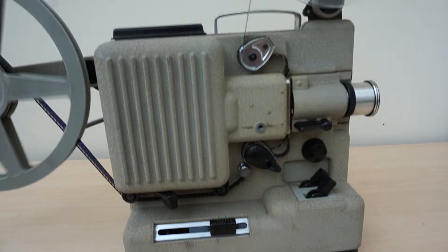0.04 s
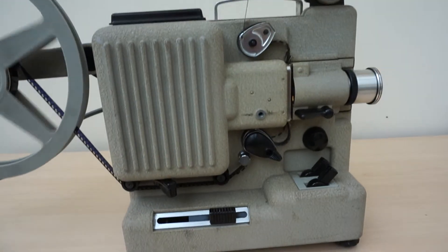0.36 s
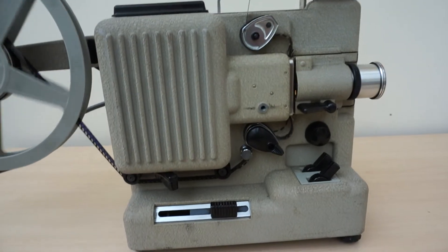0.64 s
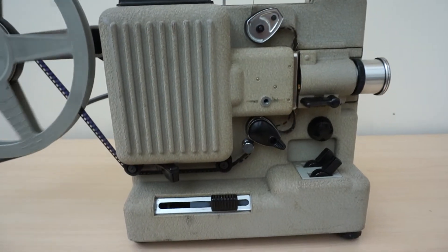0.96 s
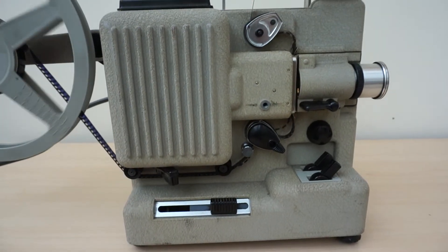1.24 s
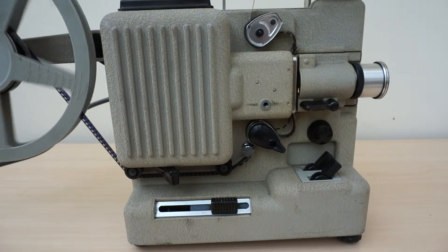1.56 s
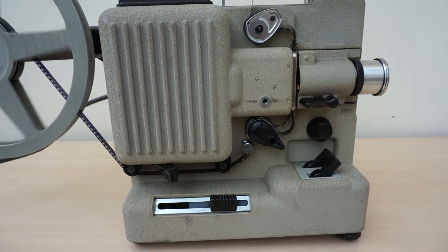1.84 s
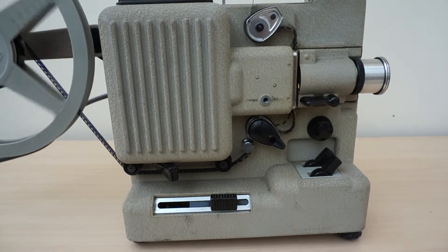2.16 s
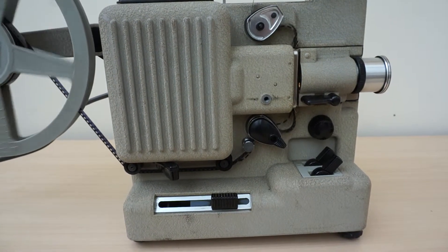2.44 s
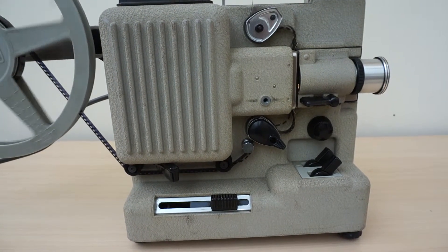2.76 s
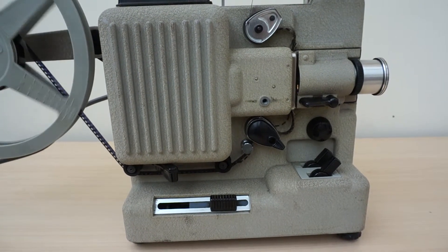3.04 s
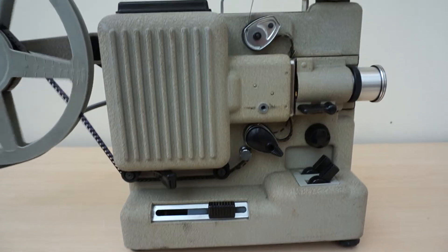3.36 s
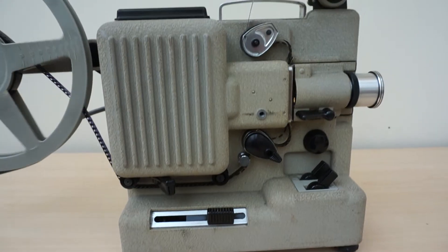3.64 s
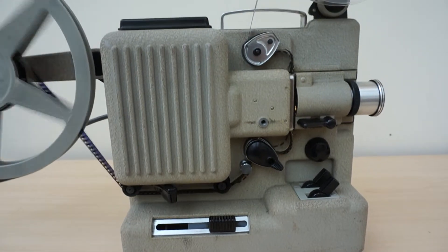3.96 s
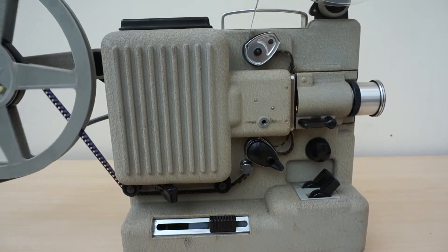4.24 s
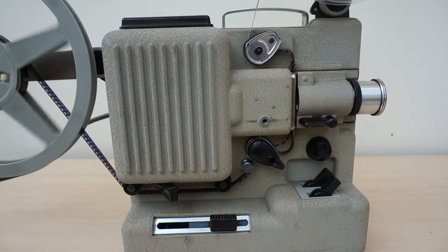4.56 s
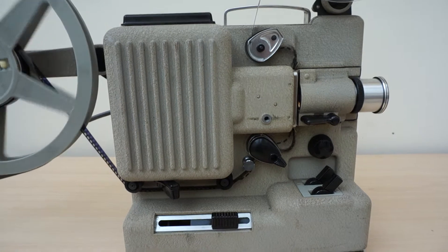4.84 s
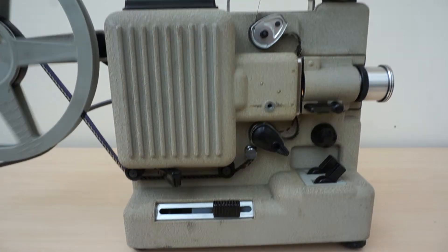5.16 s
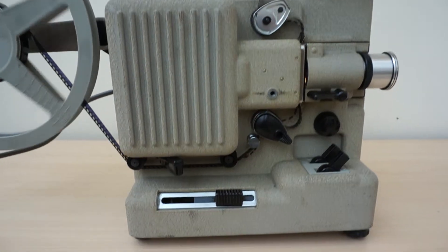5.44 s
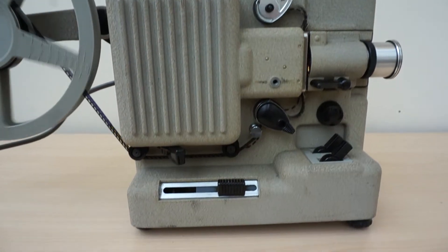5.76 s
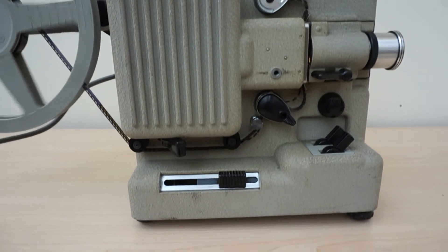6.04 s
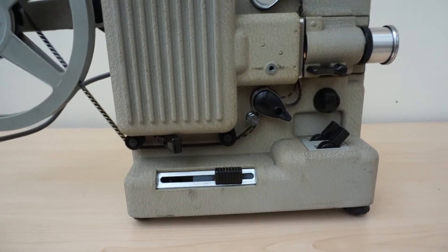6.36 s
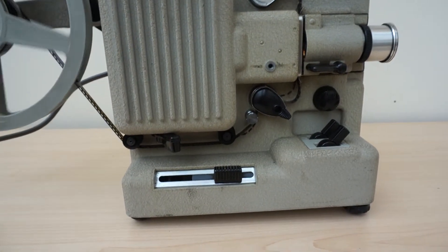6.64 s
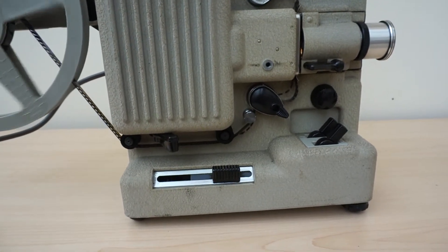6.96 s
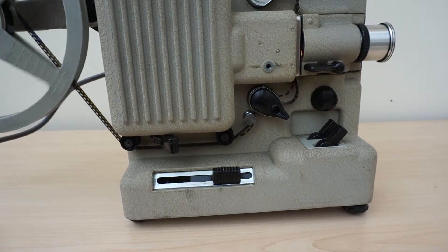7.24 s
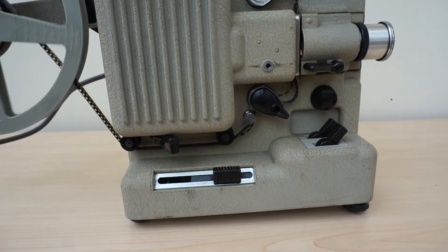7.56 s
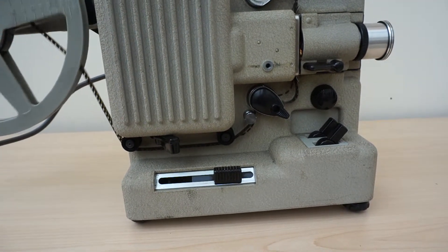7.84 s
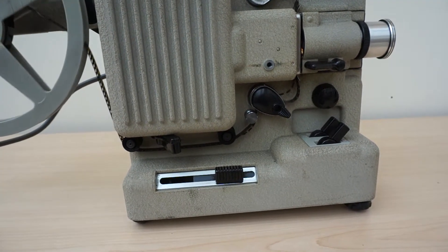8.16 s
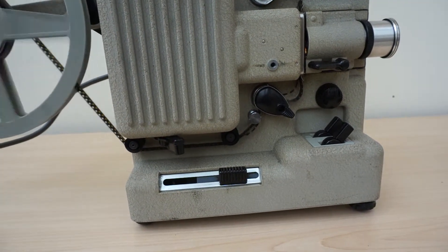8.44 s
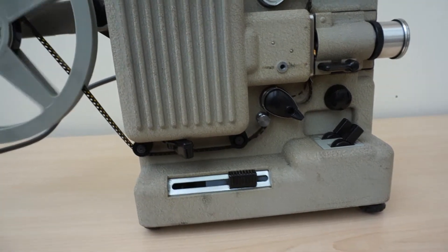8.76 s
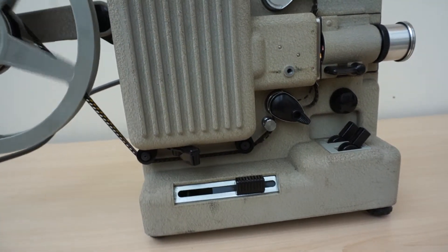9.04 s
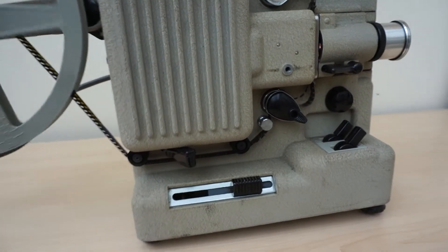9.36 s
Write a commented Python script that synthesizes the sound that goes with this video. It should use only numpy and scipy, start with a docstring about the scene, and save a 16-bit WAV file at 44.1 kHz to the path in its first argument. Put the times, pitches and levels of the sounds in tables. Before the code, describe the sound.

A small film projector runs on a table close to the microphone, in a quiet room. Sharp metallic ticks, gear knocks and the rasp of film repeat about thirteen times a second over a fan whir and faint hum. The film snaps several times in the first second and again around four seconds. The reel, to the left, gives short high squeaks and scrapes around the middle and again near the end.

```python
"""On a table, close to the microphone, a small film projector runs at about 13 frames a second.
Every frame the claw ticks, the gear train knocks, the film rasps through the gate and the guides ting,
all ringing the metal case over the whir of the fan. Now and then the film snaps on the claw or the
shutter grazes. The reel scrapes and squeaks in bouts, and the loudest peaks make the gain control
duck the whole machine."""
import sys
import numpy as np
from scipy import signal
from scipy.fft import rfft, irfft, next_fast_len
from scipy.io import wavfile
from scipy.ndimage import uniform_filter1d, map_coordinates

SR = 44100
rng = np.random.default_rng(int(sys.argv[2]) if len(sys.argv) > 2 else 0)


def log_audio(samples):
    """Write samples as a 16-bit WAV file to the path given in sys.argv[1]."""
    # one column per channel
    frames = np.atleast_2d(samples).T
    # limit to full scale, then quantise
    limited = np.clip(frames, -1, 1)
    pcm = np.round(limited * 32767).astype(np.int16)
    wavfile.write(sys.argv[1], SR, pcm)


N = 414540
TIME = np.arange(N) / SR
EDGE_HZ = 11200


def claw(level_db=4, rise_s=.00017, lag_s=.00023, top_hz=11000, glide_s=.0013,
         chatter_db=-14, chatter_s=.0031, uneven_db=1.3):
    """A hard tick as the claw enters a sprocket hole; treble runs ahead in thin metal, so it dives."""
    # how hard the claw catches the film: time_s, level_db
    bite = [(0, -27), (.7, -33), (1.2, -21), (1.6, -24), (2.3, -21), (3.1, -26), (3.5, -23), (4.3, -29),
            (5.2, -31), (5.85, -19.5), (6.45, -16.5), (6.8, -34), (7.45, -20.5), (8.3, -21), (8.9, -16),
            (9.4, -25)]
    # tone of the tick: frequency_hz, level_db
    colour = [(60, -48), (800, -26), (2500, -9), (4000, -10), (6500, 9.5), (9000, -16), (10500, 13)]
    out, t = np.zeros(N), around(.012)
    age = np.maximum(t, 0)
    envelope = age / rise_s * np.exp(1 - age / rise_s)
    tail = amp(chatter_db) * (t > 0) * np.exp(-age / chatter_s)
    sweep = 2 * np.pi * top_hz * glide_s * np.log1p(age / glide_s)
    for s in frame_times():
        db = np.interp(s, *np.transpose(bite)) + uneven_db * rng.standard_normal()
        tick = envelope * np.sin(sweep * rng.uniform(.9, 1.05))
        chatter = tail * rng.standard_normal(len(t))
        add(out, s + lag_s, amp(db) * (tick + chatter))
    return amp(level_db) * through_case(out, colour)


def gears(level_db=-27, thump_s=.00688, thump_hz=430, thump_db=-16, thump_width_s=.0016):
    """Cam and gears knock out the same run every frame; the pull-down ends in a dull thump."""
    # one frame's knocks, timed from the tick: offset_s, pitch_hz, level_db, width_s
    knocks = [(-.0366, 1570, -11, 0.00093), (-.0335, 2430, -5.5, 0.00019), (-.0312, 1576, -8.5, 0.00091),
              (-.0262, 1040, -10, 0.00084), (-.025, 680, -14.5, 0.00086), (-.0215, 1380, -4, 0.00037),
              (-.0185, 1580, -7.5, .00036), (-.015, 966, -12, 0.00097), (-.0143, 1480, -6, 0.00085),
              (-.0085, 1240, -9.5, 0.00078), (-.0075, 2440, -17.5, 0.0021), (-.0055, 1650, -8, 0.00053),
              (-.0037, 1330, -5.5, 0.00053), (-.0035, 1010, -10.5, 0.00065), (.0022, 2720, -8.5, 0.00065),
              (.0019, 1052, -5, 0.0013), (.0036, 1470, -4, 0.00073), (.004, 1270, -6.5, 0.0015),
              (.008, 1360, -22, 0.001), (.0162, 2450, -12, .001), (.0175, 1380, -8, 0.0013),
              (.02, 1050, -7.5, 0.00081), (.0208, 1750, -10.5, 0.00067), (.022, 1270, -7, 0.00067),
              (.030, 1290, -3.5, 0.00047), (.0335, 1750, -3, 0.00038), (.0343, 1110, -7, 0.00096),
              (.0372, 1550, -3.5, 0.00046), (.0385, 950, -12, .00085)]
    run = knocks + [(thump_s, thump_hz, thump_db, thump_width_s)]
    return amp(level_db) * through_case(strikes(run, jitter_s=.00007, uneven_db=.8, detune=.016))


def gate(level_db=-30.5, uneven_db=1.5, grain_db=.2):
    """Film slides through the gate: grainy friction in several short strokes a frame."""
    # one frame's strokes, timed from the tick: offset_s, width_s, level_db
    rasps = [(-.030, 0.0042, -13.5), (-.0185, 0.0014, 1), (-.0042, 0.0011, 2.5), (.0015, 0.0011, 4.5),
             (.006, 0.0014, 4), (0.0196, 0.0012, 2), (0.0346, 0.003, -4)]
    # tone of the friction: frequency_hz, level_db
    colour = [(60, -52), (500, -52), (1500, 3), (2700, 6), (4000, -1.5), (6000, -1.5), (8500, 1),
              (11000, -0.5)]
    strokes = np.zeros(N)
    for s in frame_times():
        for (offset, width, db), hard in zip(rasps, rng.standard_normal(len(rasps))):
            add(strokes, s + offset, amp(db + uneven_db * hard) * bell(around(4 * width), width))
    grains = unit(amp(grain_db * noise_band(0, 930)) * rng.standard_normal(N))
    return amp(level_db) * through_case(strokes * grains, colour)


def guides(level_db=-38):
    """The sprung guides ting as the film jerks past: fine, regular, metallic."""
    # one frame's tings, timed from the tick: offset_s, pitch_hz, level_db, width_s
    tings = [(-.0325, 7600, -29, 0.00099), (-.0325, 5130, -14, 0.0015), (-.024, 7550, -3.5, 0.00087),
             (-.019, 5020, -2, .0014), (-.005, 7700, 1, .0009), (-.003, 5300, -0.5, .0008),
             (.001, 5300, -18, .0007), (.003, 6160, -4.5, .0009), (.0185, 7700, 0, 0.00073),
             (.0192, 5250, -5, .0012), (.020, 9000, -6, .0007), (.034, 5150, 1.5, 0.0016)]
    return amp(level_db) * through_case(strikes(tings, jitter_s=.0005, uneven_db=1, detune=.0093))


def snaps(crack_db=-2, ring_db=-1, second_db=-5, blur_rad=.45):
    """The film catches and lets go: a crack with two short, rough rings of the taut strip."""
    # snaps on the claw: start_s, level_db, ring_hz, second_ring_hz, rise_s
    catches = [(0.2916, -17, 2250, 4700, 0.001), (0.4506, -23, 2280, 4100, 0.00063),
               (.609, -24, 2630, 3700, 0.0019), (.61, -29, 553, 520, .004),
               (.7645, -28, 1380, 2500, 0.0018), (0.8428, -11.5, 8800, 9600, 0.00038),
               (.8454, -11.5, 2240, 3850, 0.0015), (0.8485, -15, 4500, 8400, 0.00056),
               (0.921, -17, 8750, 1370, 0.00067), (0.9244, -14, 2250, 1340, 0.0021),
               (0.9266, -10, 8900, 3600, 0.00058), (1.0783, -10, 3930, 2730, 0.00082),
               (2.1428, -21.5, 4440, 7400, 0.0012), (3.5902, -17, 8400, 9600, .0004),
               (3.8434, -14, 2360, 2510, 0.00092), (4.233, -25, 2350, 2700, 0.00123),
               (4.3075, -22, 2350, 2680, .0012), (4.389, -22, 2390, 3900, .0013),
               (4.4692, -17, 9000, 7830, 0.0016), (4.471, -13, 3930, 2440, 0.0014),
               (4.6225, -22.5, 2590, 2750, 0.0016)]
    # tone of the crack: frequency_hz, level_db
    colour = [(40, -44), (200, -34), (600, -14), (1200, -12.5), (2400, -4), (3500, -15.5), (6000, -16),
              (8800, -13.5), (11000, -17.5)]
    crack, ring, wander = np.zeros(N), np.zeros(N), noise_band(0, 380)
    for s, db, hz, second_hz, rise in catches:
        t = around(10 * rise)
        age = np.maximum(t, 0) / rise
        envelope = amp(db) * age * np.exp(1 - age)
        slip = blur_rad * wander[int(s * SR):][:len(t)]
        first = amp(ring_db) * np.sin(2 * np.pi * hz * t + slip)
        second = amp(second_db) * np.sin(2 * np.pi * second_hz * t - slip)
        add(crack, s, envelope)
        add(ring, s, envelope * (first + second))
    ring = signal.sosfilt(signal.butter(3, 350, "high", fs=SR, output="sos"), ring)
    return amp(crack_db) * through_case(crack * rng.standard_normal(N), colour) + ring


def squeaks(sag=.0044, smear=.045, rasp_db=-8, reel_hz=8170, reel_db=-14):
    """Stick-slip whistles sag in pitch; rough contact smears them and adds rasp. The reel rings on."""
    # reel squeaks: middle_s, length_s, pitch_hz, level_db, sub_octave_db, roughness (0-1)
    whistles = [(1.877, 0.1, 4160, -34, -30, 0.44), (2.917, .044, 5310, -35, -30, .25),
                (2.974, .045, 5320, -28, -30, .3), (3.334, .007, 6300, -23, -30, .7),
                (3.335, 0.0076, 4020, -22.5, -30, .3), (3.399, 0.012, 8220, -14.5, -7, 0),
                (3.445, 0.014, 8210, -4, -11, 0.14), (3.471, 0.013, 8150, -7.5, -6, 0.2),
                (3.498, 0.014, 8060, -12, -2.5, 0.4), (3.528, .005, 5000, -18, -30, 0.4),
                (3.545, .006, 5050, -21, -17, 0.4), (3.86, .022, 6040, -31, -30, .25),
                (3.891, .028, 4780, -31, -30, 0.4), (3.895, .016, 7400, -33, -30, .15),
                (3.898, .014, 6070, -30, -28.5, .2), (3.922, 0.03, 5300, -17, -12, 0),
                (3.92, .012, 6740, -25, -29, .1), (3.933, .016, 6280, -24, -30, .15),
                (3.951, .01, 6300, -27, -30, .15), (3.952, 0.014, 4570, -25, -30, 0),
                (6.046, 0.055, 4130, -31, -30, 0.6), (6.08, 0.04, 6550, -35, -30, 0.2),
                (6.367, .075, 5130, -30, -30, .5), (6.372, 0.015, 5130, -27, -30, 0.56),
                (7.493, .012, 6370, -25, -30, .4), (7.513, 0.0091, 6400, -24, -30, 0.4),
                (7.533, .0075, 6350, -6.5, -22, .15), (7.635, 0.015, 8150, -7.5, -6.5, 0.13),
                (7.669, 0.015, 8130, -3.5, -11.5, 0.15), (7.694, 0.0097, 7930, -8.5, -4, .3),
                (7.696, 0.015, 5000, -18, -30, 0.4), (7.698, .015, 7100, -15, -30, .5)]
    out, wander, rasp = np.zeros(N), noise_band(0, 450), noise_band(7000, 1300)
    for s, length, hz, db, sub_db, rough in whistles:
        t = around(length / 2)
        now = slice(int(s * SR), int(s * SR) + len(t))
        pitch_hz = hz * (1 - sag * t / length + smear * rough * wander[now])
        phase = 2 * np.pi * np.cumsum(pitch_hz) / SR
        tone = np.sin(phase) + amp(sub_db) * np.sin(phase / 2) + amp(rasp_db) * rough * rasp[now]
        add(out, s, amp(db) * tone * signal.windows.tukey(len(t), .8))
    return out + amp(reel_db) * ringing(out, reel_hz, width_hz=15)


def scrapes(width_hz=3200, grain_db=2):
    """The film's edge brushes the reel's rim: a grainy hiss that swells and breaks off."""
    # brushes on the rim: peak_s, swell_s, fade_s, centre_hz, level_db
    brushes = [(3.334, 0.047, .008, 6550, -28.5), (3.4, 0.0058, .008, 6340, -14),
               (3.5, 0.13, .09, 7900, -30), (3.926, 0.099, .047, 6100, -23.5),
               (3.949, .009, .0036, 6950, -22), (6.101, 0.053, 0.046, 6750, -31),
               (7.52, 0.034, .03, 7800, -30), (7.576, 0.0072, .0076, 7200, -17.5),
               (7.699, 0.049, 0.056, 7000, -29), (8.392, .076, .04, 7700, -26.5),
               (8.417, 0.021, 0.014, 6840, -25.5)]
    out, t = np.zeros(N), around(.12)
    treble = signal.butter(2, [2500, EDGE_HZ], "band", fs=SR, output="sos")
    for s, swell, fade, hz, db in brushes:
        flicker = unit(uniform_filter1d(rng.standard_normal(len(t)), size=150))
        grains = amp(grain_db * flicker) * rng.standard_normal(len(t))
        hiss = unit(signal.sosfilt(treble, ringing(grains, hz, width_hz)))
        add(out, s, amp(db) * np.interp(t, [-swell, 0, fade], [0, 1, 0]) * hiss)
    return out


def shutter(level_db=4, hz=6900, width_s=.00035, detune=.025):
    """Shutter blades graze their housing in short runs of tiny, high, dry ticks."""
    # blade contacts: time_s, level_db
    grazes = [(.057, -24), (.491, -23), (.517, -28), (.543, -28), (2.269, -26), (2.323, -30), (5.135, -30),
              (5.156, -24), (5.186, -27), (6.027, -27), (6.053, -26), (6.106, -20), (6.16, -27),
              (6.213, -28), (6.969, -30), (7.021, -30), (7.047, -19), (7.074, -28), (7.1, -27),
              (7.153, -26), (7.224, -30), (8.014, -24)]
    out = np.zeros(N)
    for (s, db), bend in zip(grazes, rng.standard_normal(len(grazes))):
        add(out, s, amp(db) * blip(hz * np.exp(detune * bend), width_s))
    return amp(level_db) * out


def motor(whir_db=-37):
    """Fan air blows through the case, over wavering hum lines."""
    # tone of the fan: frequency_hz, level_db
    colour = [(20, -37), (70, -30.5), (120, -21.5), (220, -14), (320, -7), (480, -7.5), (800, -2.5),
              (1500, -5.5), (2500, 1.5), (3700, -8), (5300, -12), (11000, -11.5)]
    # motor and mains hum: pitch_hz, level_db, waver_hz
    lines = [(114.2, -69, 1.1), (202, -71, 0.36), (299.7, -64.5, 1.99), (332.7, -60, 0.93),
             (535.8, -54.5, 7), (645.5, -53, 6.9)]
    out = amp(whir_db) * unit(through_case(rng.standard_normal(N), colour))
    for hz, db, waver_hz in lines:
        pitch_hz = hz + waver_hz * noise_band(0, 5.18)
        out += amp(db) * np.sqrt(2) * np.sin(2 * np.pi * np.cumsum(pitch_hz) / SR)
    return out


def mesh(level_db=-40, teeth=12, depth=.35, load=.057, load_turn=.022, drift_per_s=.603):
    """Gear teeth grind, hardest in the pull-down; their flaws repeat every turn, changing slowly."""
    # tone of the teeth: frequency_hz, level_db
    colour = [(60, -75), (240, -10), (340, -5.5), (460, -0.5), (950, 3.5), (1600, 1.5), (2500, 8.5),
              (3600, 14), (5200, -28), (11000, -50)]
    frames, flaws = frame_times(), rng.standard_normal((16, 400))
    turn = np.interp(TIME, frames, np.arange(len(frames)))
    position = [TIME * drift_per_s, turn % 1 * flaws.shape[1]]
    contact = map_coordinates(flaws, position, order=2, mode="grid-wrap")
    tooth_pulse = 1 + depth * np.cos(2 * np.pi * teeth * turn)
    pull_down = 1 + load * np.cos(2 * np.pi * (turn - load_turn))
    return amp(level_db) * unit(through_case(contact * tooth_pulse * pull_down, colour))


def cover(knocks, low_hz=2442, high_hz=3250, width_hz=70, high_db=-6):
    """The knocks ring two sheet-metal modes of the lamp cover."""
    # the ring grows as the microphone nears it: time_s, level_db
    nearness = [(0, -66), (4.5, -50), (5.6, -45), (6.3, -42), (7.3, -39), (8.1, -43.5), (8.7, -38.5),
                (9.4, -38.5)]
    low, high = (unit(ringing(knocks, hz, width_hz)) for hz in (low_hz, high_hz))
    return curve(nearness) * (low + amp(high_db) * high)


def handling(hz=45, width_s=.011):
    """A hand bumps the camera body: faint, low thuds."""
    # soft bumps: time_s, level_db
    bumps = [(.849, -70), (1.079, -70), (2.147, -61), (4.47, -74), (6.202, -62), (8.39, -69)]
    out = np.zeros(N)
    for s, db in bumps:
        add(out, s, amp(db) * blip(hz, width_s))
    return out


def frame_times(first_tick_s=.0498):
    """The moment of each film frame, one per turn of the mechanism, plus one past each end."""
    # speed sags and recovers with the pull of the reel: time_s, frames_per_s
    speed = [(0.0, 12.413), (0.84, 12.775), (1.47, 12.712), (1.52, 12.882), (2.0, 12.736), (2.36, 12.561),
             (3.32, 12.562), (4.12, 12.867), (4.97, 12.728), (5.44, 12.744), (5.78, 12.555), (6.4, 12.82),
             (6.94, 12.692), (7.6, 12.842), (7.93, 12.736), (8.53, 12.957), (9.4, 12.862)]
    turns = np.cumsum(np.interp(TIME, *np.transpose(speed))) / SR
    turns -= np.interp(first_tick_s, TIME, turns)
    s = np.interp(np.arange(int(turns[-1]) + 1), turns, TIME)
    return np.r_[2 * s[0] - s[1], s, 2 * s[-1] - s[-2]]


def strikes(rows, jitter_s, uneven_db, detune):
    """Plays a run of short pitched blows once a frame, never quite alike."""
    out = np.zeros(N)
    for s in frame_times():
        for offset, hz, db, width in rows:
            late, hard, bend = rng.standard_normal(3)
            blow = amp(db + uneven_db * hard) * blip(hz * np.exp(detune * bend), width)
            add(out, s + offset + jitter_s * late, blow)
    return out


def through_case(x, colour=None, size=8192):
    """Rings a sound through the metal case, with the source's own colour, at unit filter power."""
    # case resonances: centre_hz, width_hz, lift_db
    modes = [(469, 32, 6.5), (553, 35, 5.5), (650, 32, 1.5), (738, 38, 5.5), (808, 21, 5), (924, 67, 4.5),
             (998, 83, 8), (1287.5, 54, 6), (1312, 128, 5.5), (1599, 21, 10), (1705, 172, 7.5),
             (2054, 126, 5.5), (2460, 100, -1), (3450, 550, 4), (4210, 470, 5), (4920, 174, 8),
             (5366, 100, 9), (6070, 700, 2.5), (7520, 95, 6), (9410, 1560, 4)]
    hz = np.fft.rfftfreq(size, 1 / SR)
    db = sum(lift / (1 + (2 * (hz - centre) / width) ** 2) for centre, width, lift in modes)
    if colour is not None:
        db = db + read(colour, hz)
    gain = np.maximum(amp(db) / np.sqrt(1 + (hz / EDGE_HZ) ** 20), 1e-5)
    log_gain = np.log(unit(gain))
    # minimum phase, so the ring follows the hit
    log_response = np.conj(signal.hilbert(np.r_[log_gain, log_gain[-2:0:-1]]))
    ring = np.fft.ifft(np.exp(log_response)).real
    return signal.oaconvolve(x, ring[:size // 2])[:N]


def room(x):
    """A short diffuse tail, different at each ear."""
    # room decay: frequency_hz, t60_s
    decay = [(200, 0.072), (1500, 0.11), (5000, 0.43), (11000, 0.17)]
    taps = rng.standard_normal((2, SR // 2)) * (np.arange(SR // 2) > .003 * SR)
    hz, t, bands = signal.stft(taps, SR, nperseg=256)
    fade = amp(-60 * t / read(decay, hz)[:, None])
    tail = signal.istft(bands * fade, SR, nperseg=256)[1]
    return signal.fftconvolve(x[None], tail / np.linalg.norm(tail[0]), axes=1)[:, :N]


def place(x, left_db, wet_db):
    """Pans a source and sends it to the room."""
    return x * amp([[left_db / 2], [-left_db / 2]]) + amp(wet_db) * room(x)


def amp(db):
    """Decibels to gain."""
    return 10 ** (np.asarray(db) / 20)


def unit(x):
    """Scales to rms 1."""
    return x / np.sqrt(np.mean(x ** 2) + 1e-20)


def read(points, hz):
    """Reads a spectrum on a log-frequency axis."""
    f, value = np.transpose(points)
    return np.interp(np.log(hz + 1), np.log(f), value)


def curve(rows):
    """A fader ride from rows of time_s, level_db."""
    return amp(np.interp(TIME, *np.transpose(rows)))


def add(mix, middle_s, sound):
    """Mixes in a sound centred on a moment."""
    start = round(middle_s * SR) - len(sound) // 2
    lo, hi = max(start, 0), min(start + len(sound), N)
    if hi > lo:
        mix[lo:hi] += sound[lo - start:hi - start]


def around(half_s):
    """A time axis from -half_s to half_s."""
    n = int(half_s * SR) + 1
    return np.arange(-n, n + 1) / SR


def bell(t, width):
    """A smooth bump of height 1."""
    return np.exp(-.5 * (t / width) ** 2)


def blip(hz, width_s):
    """A sine under a bell-shaped envelope."""
    t = around(4 * width_s)
    return bell(t, width_s) * np.sin(2 * np.pi * hz * t)


def noise_band(hz, width_hz):
    """A bell-shaped noise band of rms 1; centred on 0 Hz it is a wander."""
    size = next_fast_len(N)
    band = bell(np.fft.rfftfreq(size, 1 / SR) - hz, width_hz)
    return unit(irfft(rfft(rng.standard_normal(size)) * band, size)[:N])


def ringing(x, hz, width_hz):
    """What one mode picks up from a sound."""
    return signal.lfilter(*signal.iirpeak(hz, hz / width_hz, SR), x)


def release(over_db, db_per_s):
    """Follows a rise at once and falls back at a steady rate."""
    fall = TIME * db_per_s
    return np.maximum.accumulate(over_db + fall) - fall


def scene():
    """Running gear in the middle, lamp cover and gate a little right, the reel to the left."""
    # loudness of the running gear: time_s, level_db
    effort = [(0, 3), (.7, 4), (1.7, 3.5), (2.7, 4), (3.6, 3), (4.5, 3.5), (5.5, 4), (6.4, 4), (7.3, 4.5),
              (8.2, 1.8), (9.4, 4.5)]
    knocks = gears()
    machine = curve(effort) * (knocks + mesh() + motor())
    body = place(machine, left_db=-.3, wet_db=-7.5) + place(cover(knocks), left_db=-2.5, wet_db=-5.5)
    film = place(claw() + gate() + guides() + snaps() + shutter(), left_db=-1, wet_db=-11)
    reel = place(squeaks() + scrapes(), left_db=5, wet_db=-14)
    return body + film + reel + handling()


def record(dry, threshold_db=-21.5, slow_share=.31, emphasis=.34):
    """Treble-keyed gain control with a quick and a slow release, then a low-pass."""
    bright = signal.lfilter([1, -emphasis], [1], dry)
    power = uniform_filter1d((bright ** 2).mean(0), size=480)
    over_db = np.maximum(10 * np.log10(abs(power) + 1e-12) - threshold_db, 0)
    duck_db = np.maximum(release(over_db, db_per_s=82), release(slow_share * over_db, db_per_s=8.5))
    ducked = dry / amp(uniform_filter1d(duck_db, size=200))
    lowpass = signal.firwin(301, EDGE_HZ, window=("kaiser", 8), fs=SR)
    return signal.oaconvolve(ducked, lowpass[None], "same")


dry = scene()
out = record(dry)
log_audio(out)
```